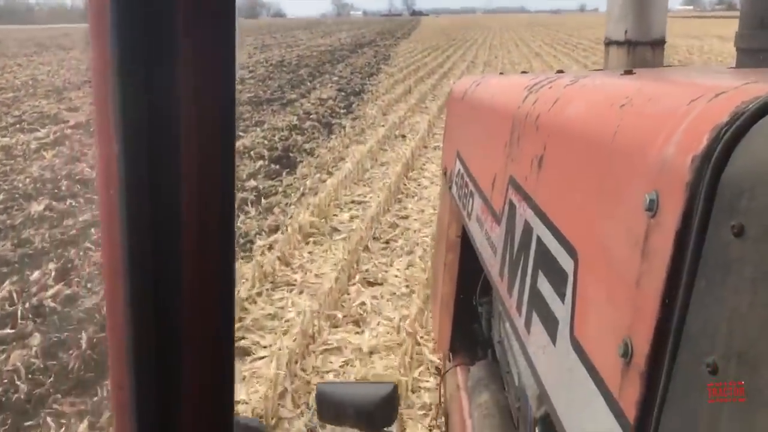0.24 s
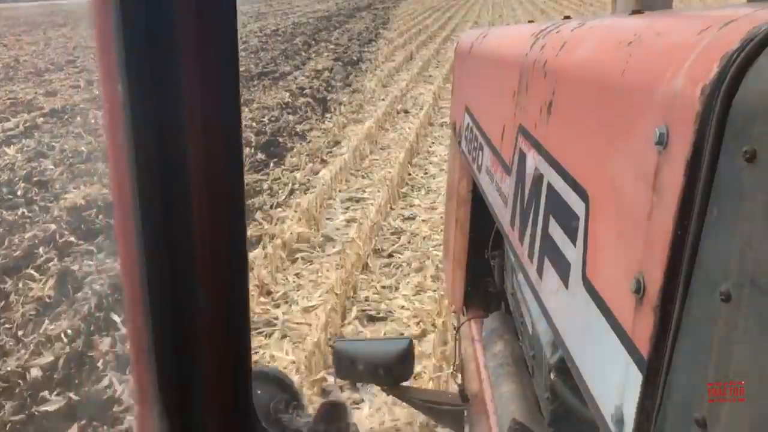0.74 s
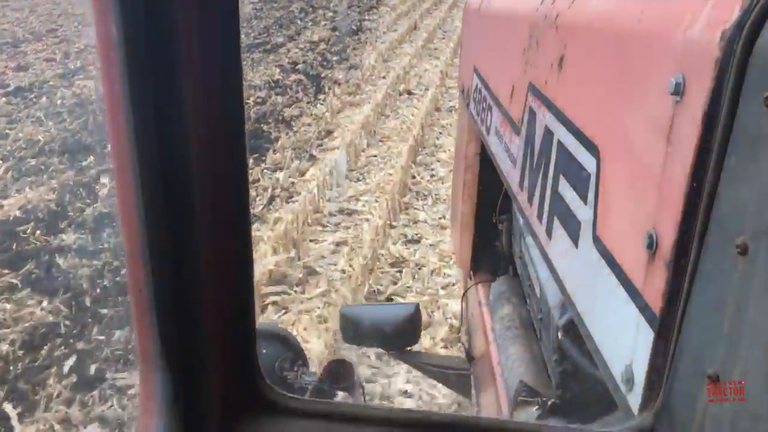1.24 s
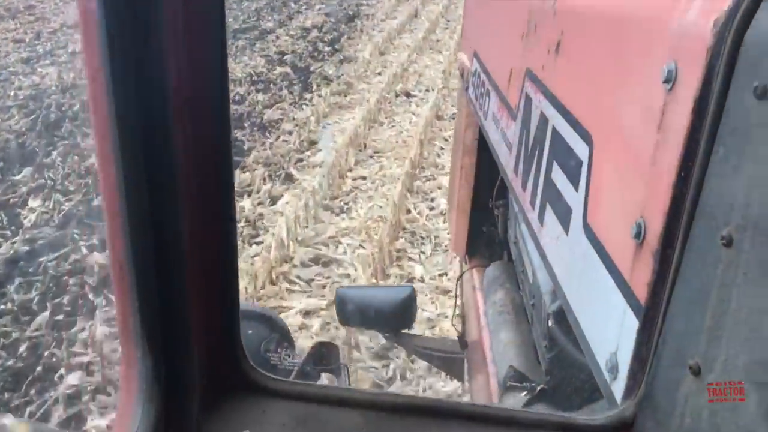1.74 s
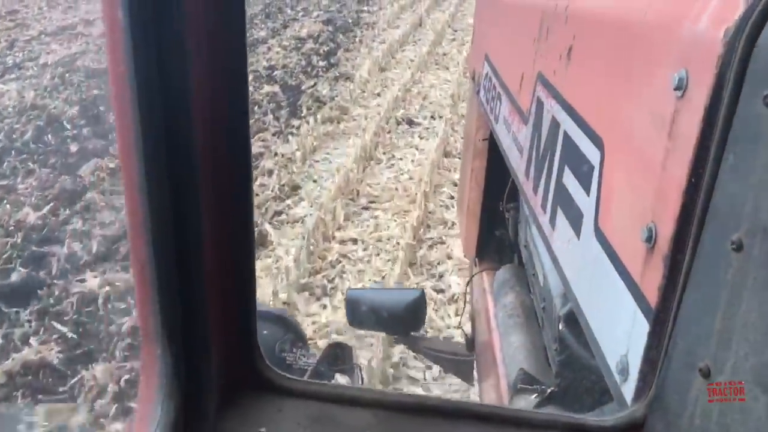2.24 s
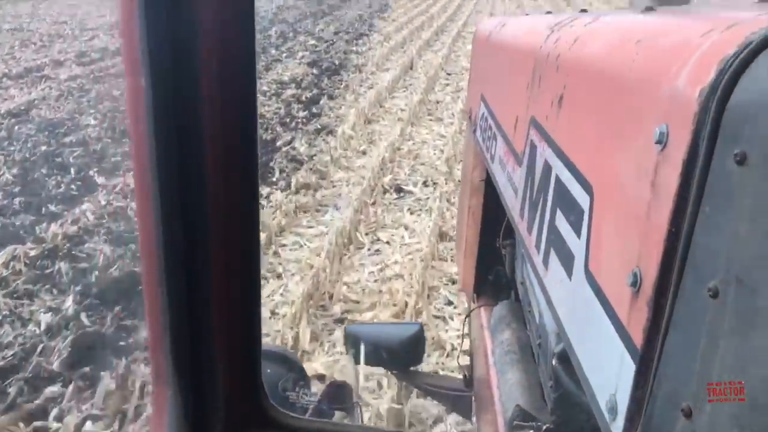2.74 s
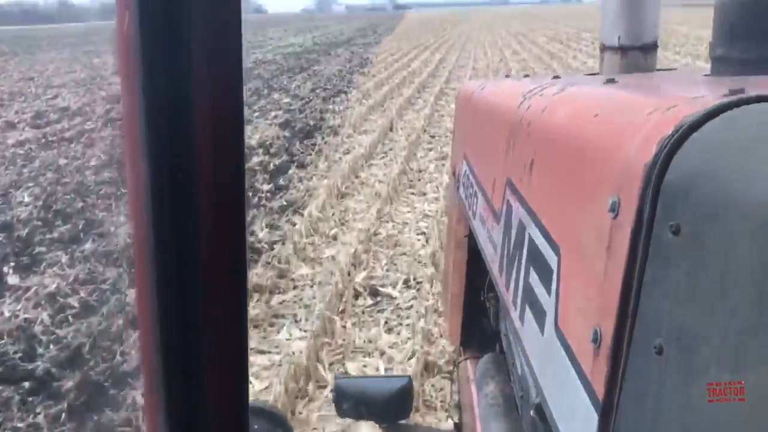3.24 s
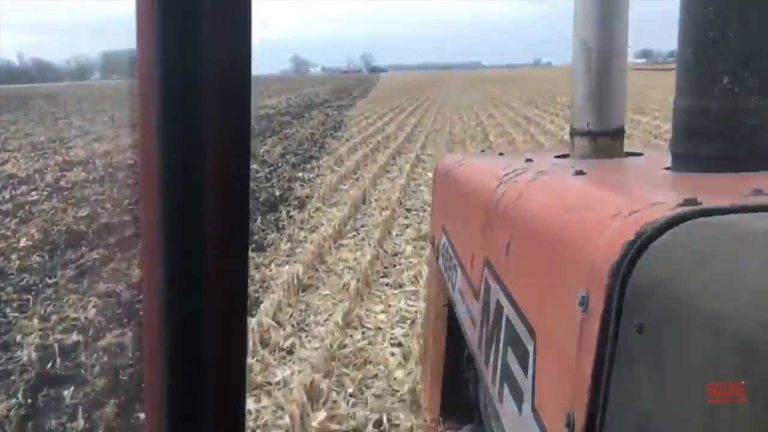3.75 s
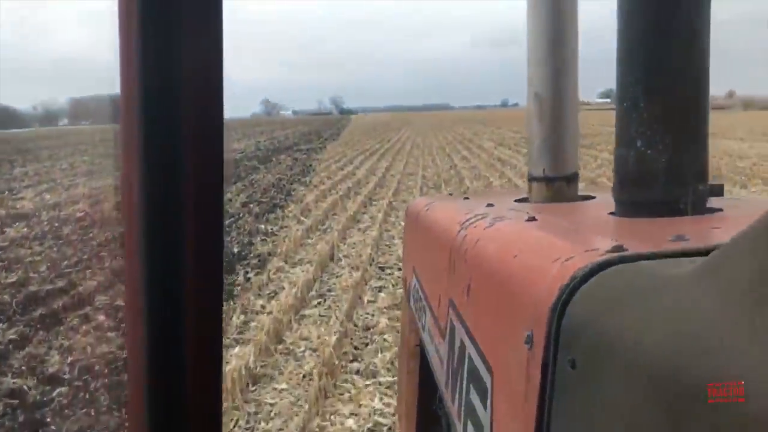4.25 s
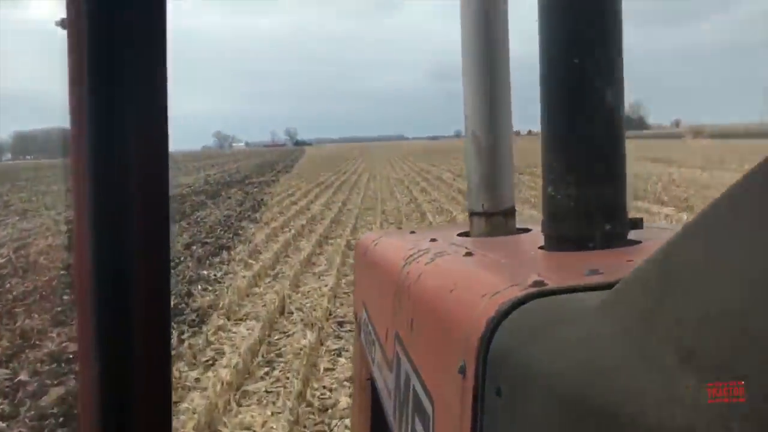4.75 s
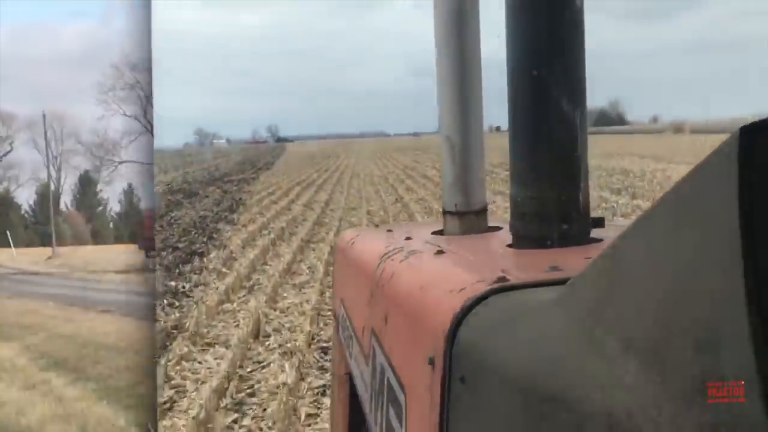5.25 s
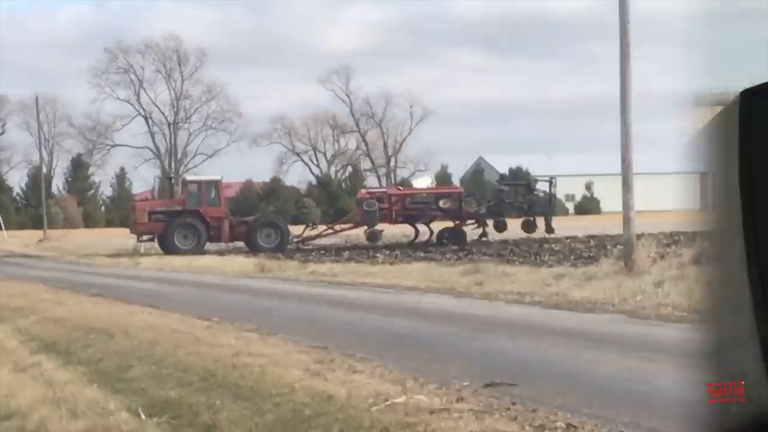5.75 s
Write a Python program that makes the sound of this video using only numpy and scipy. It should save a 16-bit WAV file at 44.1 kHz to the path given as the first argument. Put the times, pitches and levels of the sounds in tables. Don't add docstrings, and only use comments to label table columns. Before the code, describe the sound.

Close inside the cab of a large diesel tractor under load, a steady low boom near 173 hertz throbs with an uneven beat. Gears whine, valve gear clatters, loose sheet metal pings and a fan hisses. The tone shifts slightly as the microphone turns forward. In the last second it fades into a much quieter distant engine drone and whirr outdoors, with soft wind thumps.

```python
import sys
import numpy as np
from scipy import signal
from scipy.fft import rfft, irfft, next_fast_len
from scipy.io import wavfile
from scipy.ndimage import uniform_filter1d

SR = 44100
rng = np.random.default_rng(int(sys.argv[2]) if len(sys.argv) > 2 else 0)


def voltage_ratio(level):
    return 10 ** (np.asarray(level, float) / 20)


def put_to_file(sound):
    columns = np.atleast_2d(sound).T
    safe = np.clip(columns, -1, 1)
    whole_steps = np.round(safe * 32767)
    wavfile.write(sys.argv[1], SR, whole_steps.astype(np.int16))


N = 264625
CYLINDERS = 8


def gain_of(db):
    return np.exp(np.log(10) / 20 * db)


def level(x, db):
    return x * voltage_ratio(db) / np.sqrt(np.mean(x ** 2))


def curves(table):
    s, *columns = np.transpose(table)
    return [np.interp(np.arange(N) / SR, s, c) for c in columns]


def colour(x, points):
    hz, db = np.transpose(points)
    size = next_fast_len(N)
    f = np.maximum(np.fft.rfftfreq(size, 1 / SR), 1)
    response_db = np.interp(np.log(f), np.log(hz), db, left=-200, right=-200)
    return level(irfft(rfft(x, size) * voltage_ratio(response_db), size)[:N], 0)


def walk(rate):
    step = 64
    hold = max(int(SR / rate / step), 1)
    held = np.repeat(rng.standard_normal(N // (hold * step) + 2), hold)
    smooth = 1.3 * uniform_filter1d(uniform_filter1d(held, hold), hold)
    return np.interp(np.arange(N) / step, np.arange(len(held)), smooth)


def line(turns, db, sway_db, sway_rad, rate):
    gain = np.sqrt(2) * gain_of(db + sway_db * walk(rate))
    return gain * np.cos(2 * np.pi * turns + sway_rad * walk(rate))


def patchy(sound, low_hz, octaves, count, patchy_db, rate):
    out, half = 0, 2 ** (.5 / count)
    for hz in low_hz * 2 ** np.arange(0, octaves, 1 / count):
        band = signal.butter(1, [hz / half, hz * half], "band", fs=SR, output="sos")
        out = out + signal.sosfilt(band, sound) * gain_of(patchy_db * walk(rate))
    return level(out, 0)


def pulse(start_s, length_s):
    t = np.arange(N) / SR
    return np.exp(-np.minimum(((t - start_s) / length_s) ** 2, 50))


def ring(knocks, hz, t60):
    pole = np.exp(2j * np.pi * hz / SR - np.log(1000) / (t60 * SR))
    return signal.lfilter([1], [1, -pole], knocks).imag


def between(down_db, ahead_db, share):
    return (1 - share) * down_db + share * ahead_db


def distant(rise):
    # frequency in Hz, level in dB
    far_drone = [(87, -12), (142, -3.5)]
    # frequency in Hz, density in dB per Hz
    far_wind = [(25, -20), (40, -7), (85, -3.5), (150, -10), (190, -18), (300, -33)]
    # frequency in Hz, density in dB per Hz
    far_whirr = [(250, -22), (500, -6), (1000, -3), (1300, -6), (1520, 1.5), (1750, -5), (2200, -9),
                 (2700, -29.5), (3400, -21), (4200, -34), (4850, -44), (5700, -35), (9000, -48),
                 (15000, -56)]
    # time in seconds, level in dB, push +1 or pull -1, length in seconds
    gust_rows = [
        (5.762, -22.5, -1, 0.0022),
        (5.952, -26, -1, .0025),
        (6.0, -22.5, 1, 0.0027),
    ]
    t = np.arange(N) / SR
    drone = sum(line(hz * t + rng.random(), db, sway_db=2, sway_rad=.5, rate=10) for hz, db in far_drone)
    low = drone + colour(rng.standard_normal(N), far_wind)
    whirr = patchy(colour(rng.standard_normal(N), far_whirr), 233, 4.7, count=3, patchy_db=0.5, rate=14)
    gusts = sum(np.sign(push) * voltage_ratio(db) * pulse(s, length) for s, db, push, length in gust_rows)
    return voltage_ratio(-36.5) * rise ** .4 * low + voltage_ratio(-40.5) * rise * whirr + gusts


def fan(cycle):
    # frequency in Hz, density in dB per Hz
    hiss_points = [(1760, -28), (3000, -2.5), (3150, -11), (3370, -6), (3790, -7), (4860, -12),
                   (5980, -8.5), (7560, -14.5), (8150, -12), (9890, -13), (10700, -16.5), (12100, -13.5),
                   (15600, -24)]
    hiss = patchy(colour(rng.standard_normal(N), hiss_points), 2600, 2.7, count=6, patchy_db=1.4, rate=22)
    return hiss * voltage_ratio(.35 * np.cos(2 * np.pi * cycle) + .5 * walk(6.1))


def rattles():
    # time in seconds, level in dB, length in seconds
    burst_rows = [
        (1.11, -50, 0.023),
        (5.022, -51, .02),
        (5.192, -49.5, .015),
        (5.257, -46.5, .03),
    ]
    bursts = sum(voltage_ratio(db) * pulse(s, length) for s, db, length in burst_rows)
    bright = [(2600, -12), (3300, 8), (3800, 1.0), (4800, -3), (6200, -8), (9000, -14), (13000, -22)]
    return bursts * colour(rng.standard_normal(N), bright)


def tins(fade_db):
    # frequency in Hz, ring t60 in seconds, level in dB
    modes = [(740, 0.075, -47), (954.4, .06, -44), (1076, 0.044, -43), (1332, 0.053, -42.5),
             (1500, 0.039, -45.5), (1877, 0.057, -47.5), (2090, 0.024, -51), (2490, .1, -56),
             (3020, .08, -63), (3295, 0.12, -62), (3450, 0.12, -64.5)]
    # time in seconds, frequency in Hz, ring t60 in seconds, peak in dB
    pings = [
        (.539, 1000, 0.031, -26),
        (1.098, 1050, 0.033, -21),
        (2.17, 1650, 0.51, -30.5),
        (3.631, 1645, .3, -35),
        (4.279, 1900, .12, -32),
        (5.28, 1500, 0.15, -25.5),
    ]
    knocks_per_s, spread_db = 110, 1.5
    out = 0
    for hz, t60, db in modes:
        struck = rng.random(N) < knocks_per_s / SR
        force = voltage_ratio(spread_db * rng.standard_exponential(N)) * rng.standard_normal(N)
        out = out + gain_of(fade_db) * level(ring(struck * force, hz, t60), db)
    for s, hz, t60, db in pings:
        out = out + ring(voltage_ratio(db) * (np.arange(N) == int(s * SR)), hz, t60)
    return out


def chassis(load_db):
    # frequency in Hz, density in dB per Hz
    rumble_points = [(100, -9), (140, 5.5), (200, 3.5), (260, 0.5), (370, 1), (430, 2), (480, -29)]
    # frequency in Hz, density in dB per Hz
    ride_points = [(18, -17), (28, -8), (36, 5), (60, -4), (100, 2), (140, -11.5)]
    rumble = voltage_ratio(-34.0 + 0.98 * walk(2.9)) * colour(rng.standard_normal(N), rumble_points)
    ride = voltage_ratio(-35.5 + 2.7 * walk(5.04)) * colour(rng.standard_normal(N), ride_points)
    return voltage_ratio(load_db) * (rumble + ride)


def gears(cycle, ahead):
    orders = [26, 27, 28, 31, 34, 35, 39, 44, 46, 54, 58, 64, 76]
    # level in dB facing down, in dB half way, in dB facing forward
    order_db = [(-60, -54, -49.5), (-61, -49, -48.5), (-59, -51, -49), (-58, -54, -51), (-44, -54, -60),
                (-60, -51, -46), (-49.5, -44.5, -52), (-47.5, -66, -73), (-46.5, -61, -73), (-47, -44, -47),
                (-44.5, -51, -42), (-55, -43, -49), (-48.5, -42.5, -56)]
    out = 0
    for k, turn_db in zip(orders, order_db):
        db = np.interp(ahead, [.1, .6, .95], turn_db)
        out = out + line(k * cycle + rng.random(), db, sway_db=2.5, sway_rad=0.67, rate=5)
    return out


def clatter(cycle, ahead):
    # frequency in Hz, density in dB per Hz
    panels_down = [(260, -16), (440, 1), (456, -12.5), (506, -14), (593, -12), (714, -5), (793, -15.5),
                   (962, 1), (1180, -4.5), (1300, -4), (1530, -13.5), (1660, -5.5), (2030, -7.5),
                   (2690, -21), (3600, -30), (4680, -38), (7920, -120)]
    # frequency in Hz, density in dB per Hz
    panels_ahead = [(260, -36), (440, -18.5), (485, -0.5), (520, -3.5), (588, -5), (714, -3.5), (822, 1),
                    (1020, -12.5), (1230, -5), (1330, -5), (1470, 0), (1730, -5.5), (2220, -8), (2970, -24),
                    (3600, -47), (4680, -59), (7920, -120)]
    memory, loose = 0.81, 0.69
    points = 2048
    fresh = rng.standard_normal((140, points))
    kept = signal.lfilter([np.sqrt(1 - memory ** 2)], [1, -memory], fresh, axis=0)[8:].ravel()
    knocks = np.interp(cycle * points, np.arange(len(kept)), kept)
    source = np.sqrt(1 - loose) * level(knocks, 0) + np.sqrt(loose) * rng.standard_normal(N)
    firing_db = 0.78 * np.cos(2 * np.pi * CYLINDERS * cycle)
    hard_db = 3.2 * np.exp(-((cycle + 0.086) % 1) / 0.079)
    source = source * voltage_ratio(firing_db + hard_db)
    panels = np.sqrt(1 - ahead) * colour(source, panels_down) + np.sqrt(ahead) * colour(source, panels_ahead)
    return patchy(panels, 376.7, 3.2, count=5, patchy_db=1.4, rate=16)


def exhaust(cycle, boom_db, octave_db, ahead):
    # multiple of the cycle, level in dB
    beats_down = [(1, -48), (2, -13), (3, -11), (4, -12.5), (5, -14.5), (6, -11), (7, -14.5), (8, 0),
                  (9, -22), (10, -24.5), (11, -17.5), (12, -26), (13, -22.5), (14, -21), (15, -19.5),
                  (16, -16), (17, -19), (18, -17), (19, -19.5), (20, -27)]
    # multiple of the cycle, level in dB
    beats_ahead = [(1, -48), (2, -14.5), (3, -9), (4, -17), (5, -8.5), (6, -7), (7, -15), (8, 0), (9, -17),
                   (10, -11), (11, -6.5), (12, -22), (13, -21.5), (14, -15.5), (15, -31), (16, -4.5),
                   (17, -58), (18, -23.5), (19, -24), (20, -29.5)]
    out = line(CYLINDERS * cycle, boom_db, sway_db=0.85, sway_rad=0.081, rate=11)
    octave_turns = 2 * CYLINDERS * cycle - 0.44 * ahead
    out = out + line(octave_turns, octave_db + 2.0, sway_db=1.2, sway_rad=0.22, rate=4.9)
    for (k, down_db), (_, ahead_db) in zip(beats_down, beats_ahead):
        if k % CYLINDERS == 0:
            continue
        db = between(down_db - 24, ahead_db - 25, ahead)
        flip = .45 * (k > CYLINDERS) * np.clip((13 - k) / 3.5, 0, 1)
        path = .12 * np.sin(2.1 * k) + ahead * (.25 * (k in (9, 13, 14)) - .4 * (k == 5))
        path = path + .3 * ((k == 5) - (k == 7))
        out = out + line(k * cycle + flip + path, db, sway_db=1.4, sway_rad=.25, rate=5)
    return out


def crossfade():
    start_s, end_s, rise_s = 5.04, 6.115, 0.79
    since = np.arange(N) / SR - start_s
    cab = np.cos(np.pi / 2 * np.clip(since / (end_s - start_s), 0, 1)) ** 2.52
    rise = np.sin(np.pi / 2 * np.clip(since / rise_s, 0, 1)) ** 2
    return 20 * np.log10(cab + 1e-4), rise


def scene():
    # time in seconds, share facing forward 0-1
    facing = [
        (0, 0.19),
        (3.1, 0.13),
        (3.7, 0.53),
        (4.2, 0.75),
        (4.7, 0.88),
        (6, 0.95),
    ]
    # time in seconds, firing rate in Hz
    speed = [(0, 172.3), (.4, 172.0), (1.3, 173.8), (2.0, 173.55), (2.3, 172.8), (3.4, 174.2),
             (3.75, 173.1), (4.8, 173.45), (5.15, 174.6), (6, 174.6)]
    # time in seconds, level in dB
    boom = [(0, -22.5), (.3, -22.5), (.9, -24), (1.4, -21.5), (2.3, -23.5), (3.3, -21.5), (4.1, -22),
            (4.4, -23), (5.0, -25.5), (5.3, -31), (6, -27)]
    ahead = np.clip(curves(facing)[0], 0, 1)
    cycle = np.cumsum(curves(speed)[0]) / (CYLINDERS * SR) + .24
    fade_db, rise = crossfade()
    octave_db = between(-41.5, -31, ahead ** 2.6) + 2.5 * (1 - ahead) * walk(4.08)
    cab = voltage_ratio(between(-49.5, -51, ahead)) * fan(cycle)
    cab = cab + chassis(-1.5 * ahead) + gears(cycle, ahead)
    cab = cab + voltage_ratio(between(-30.5, -32.5, ahead)) * clatter(cycle, ahead)
    cab = cab + exhaust(cycle, curves(boom)[0], octave_db, ahead)
    return (distant(rise) + rattles() + tins(fade_db) + voltage_ratio(fade_db) * cab)[None]


def roll_off(x):
    return signal.sosfilt(signal.butter(12, 15740, fs=SR, output="sos"), x)


def record(dry):
    mix = np.tanh(1.832 * dry) / 1.787
    return roll_off(mix)


dry = scene()
out = record(dry)
put_to_file(out)
```